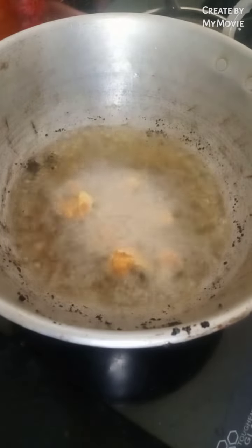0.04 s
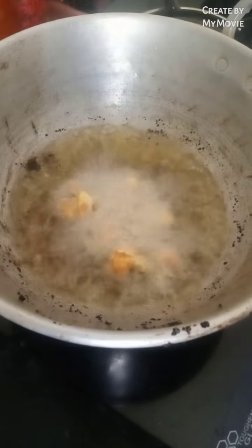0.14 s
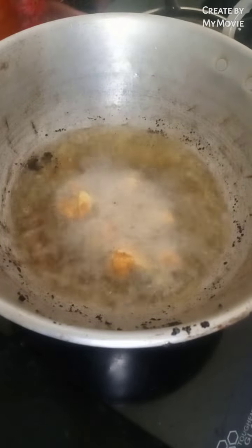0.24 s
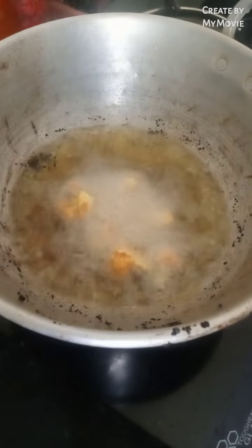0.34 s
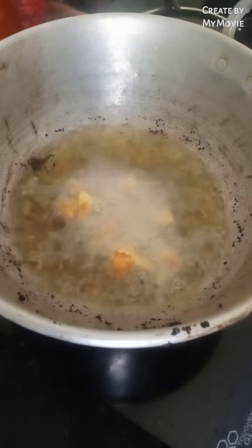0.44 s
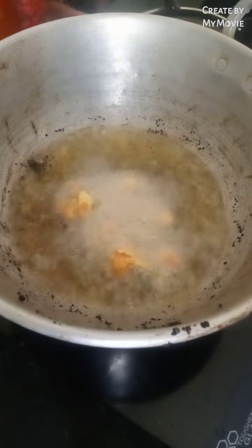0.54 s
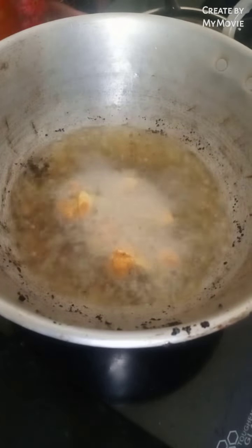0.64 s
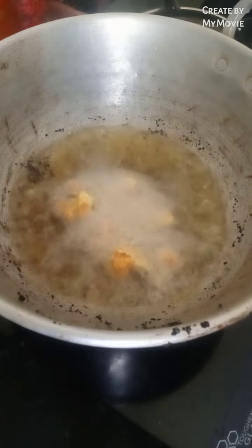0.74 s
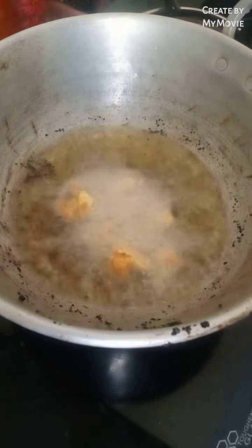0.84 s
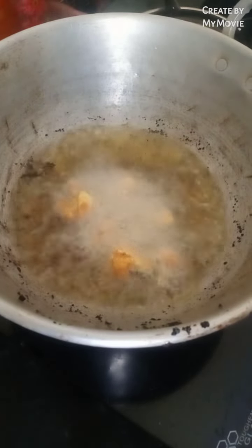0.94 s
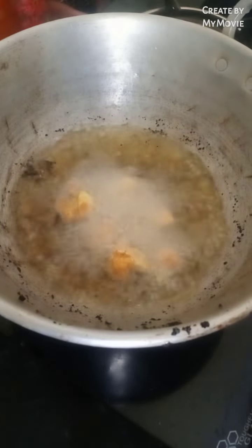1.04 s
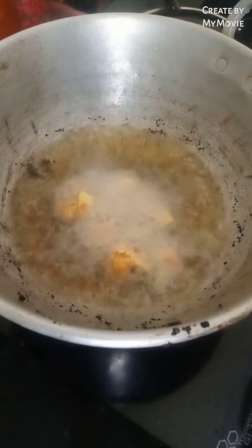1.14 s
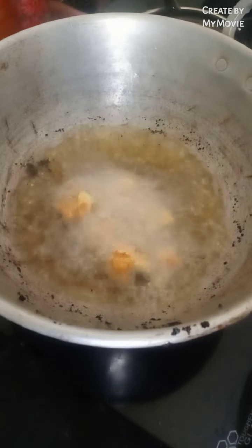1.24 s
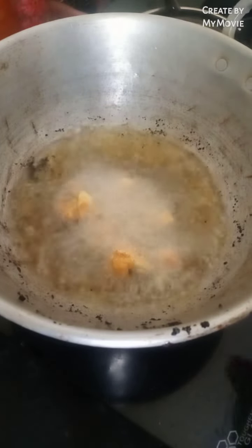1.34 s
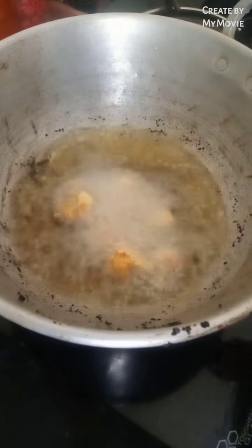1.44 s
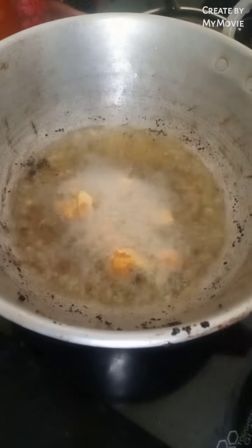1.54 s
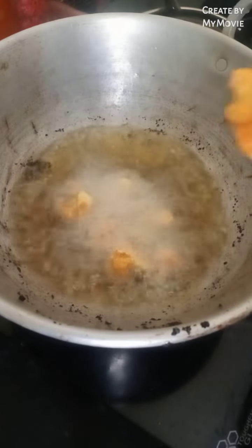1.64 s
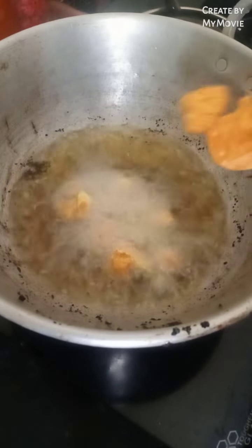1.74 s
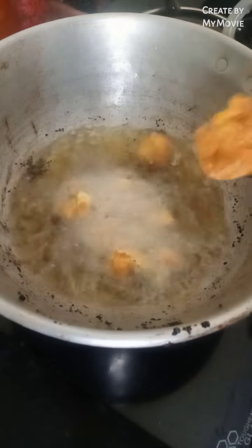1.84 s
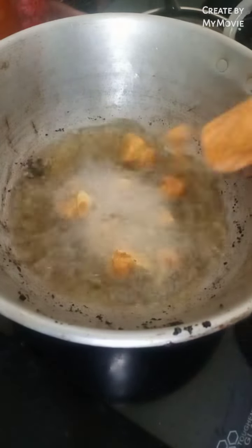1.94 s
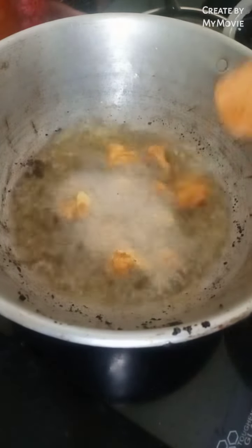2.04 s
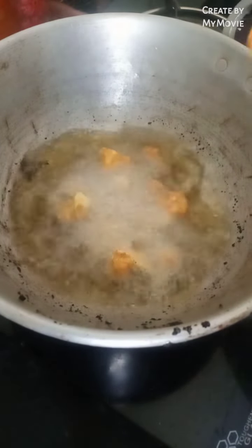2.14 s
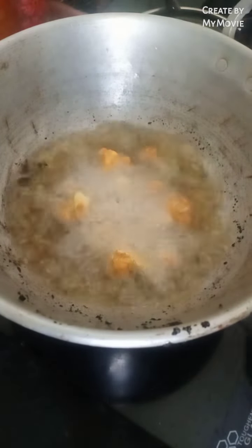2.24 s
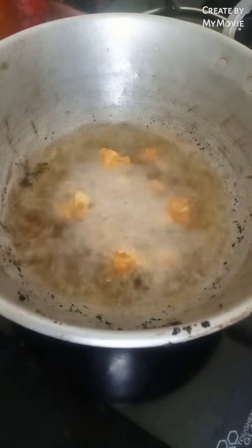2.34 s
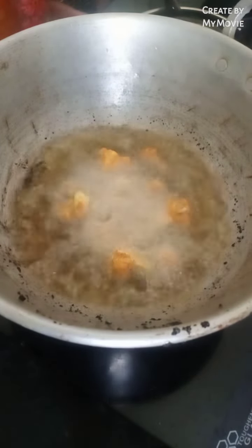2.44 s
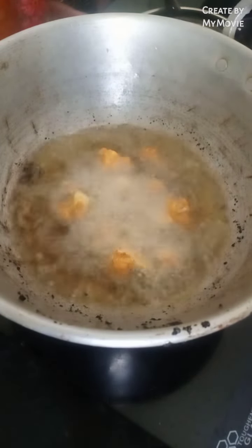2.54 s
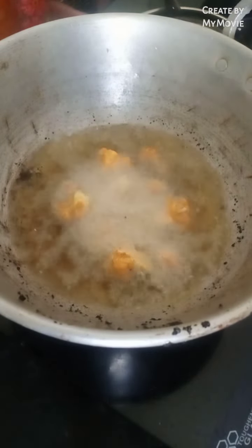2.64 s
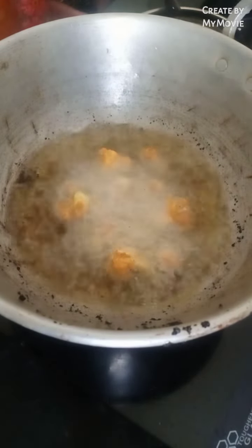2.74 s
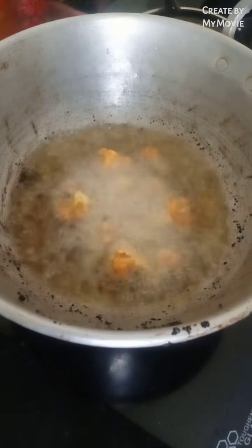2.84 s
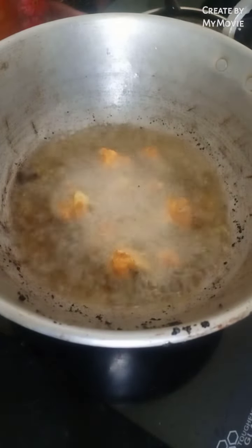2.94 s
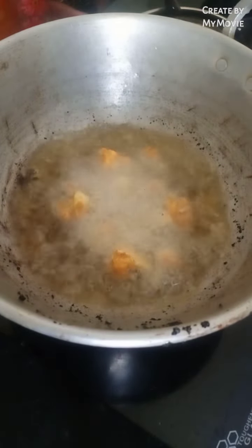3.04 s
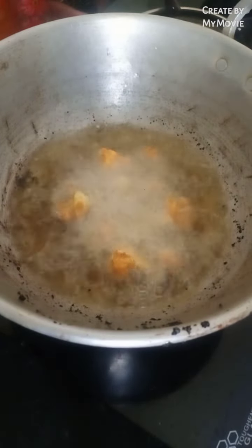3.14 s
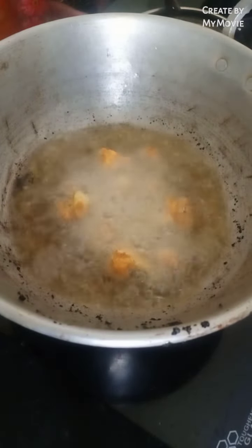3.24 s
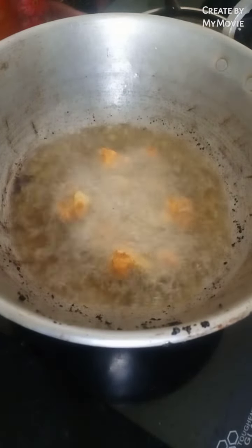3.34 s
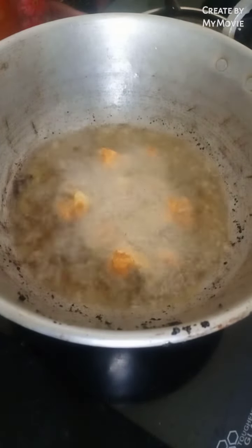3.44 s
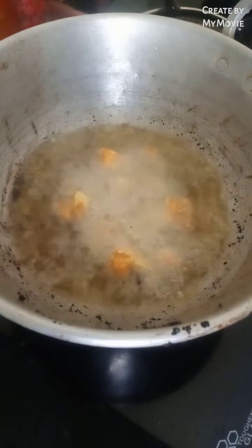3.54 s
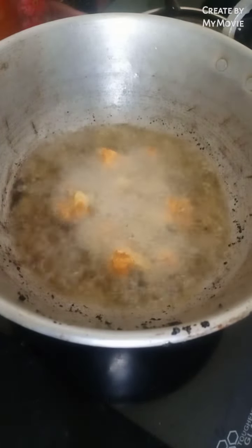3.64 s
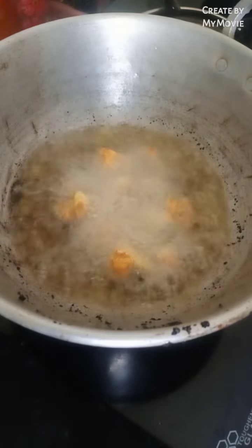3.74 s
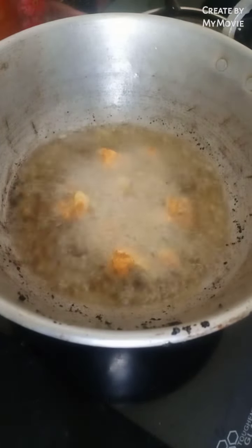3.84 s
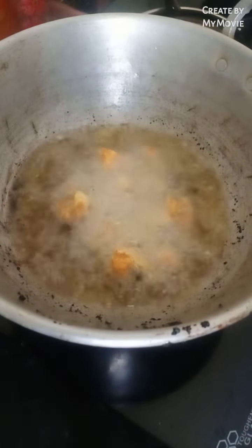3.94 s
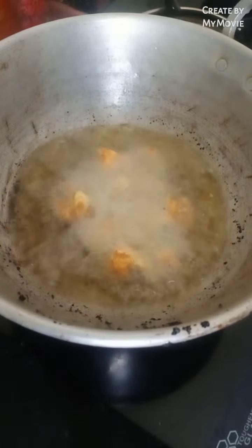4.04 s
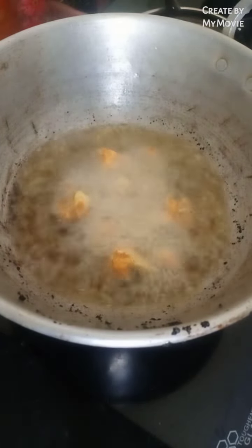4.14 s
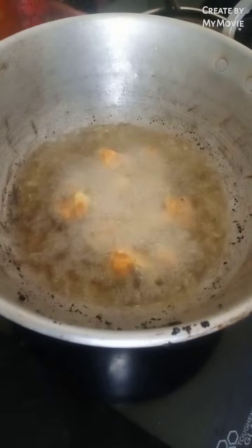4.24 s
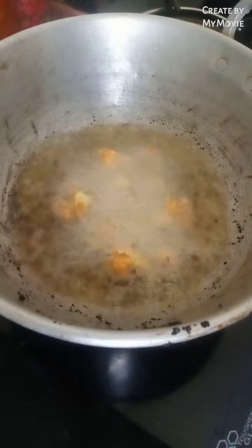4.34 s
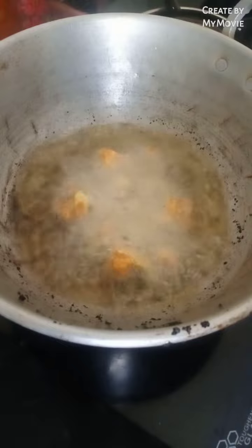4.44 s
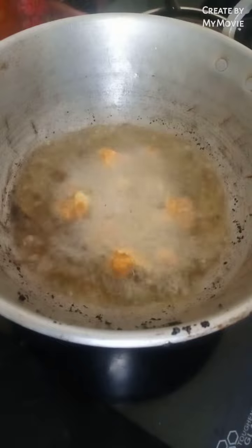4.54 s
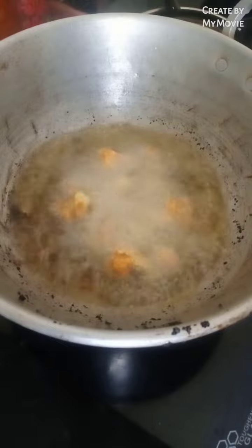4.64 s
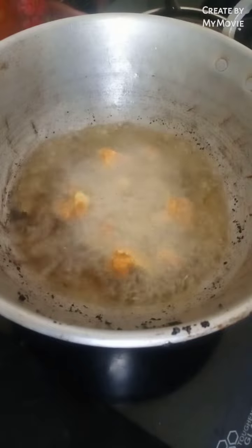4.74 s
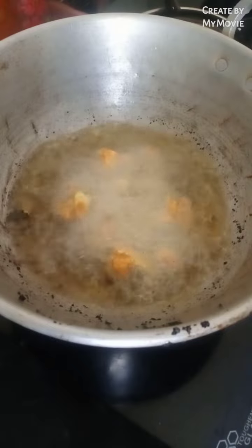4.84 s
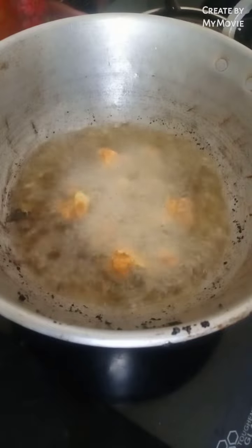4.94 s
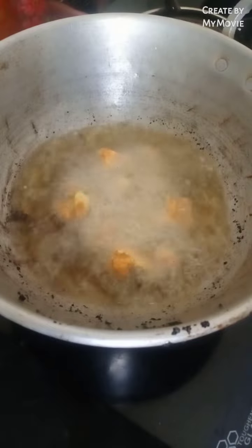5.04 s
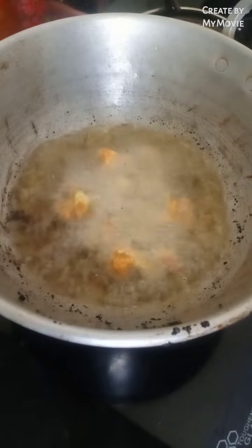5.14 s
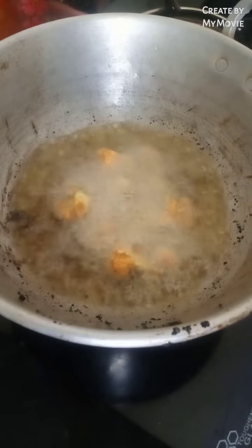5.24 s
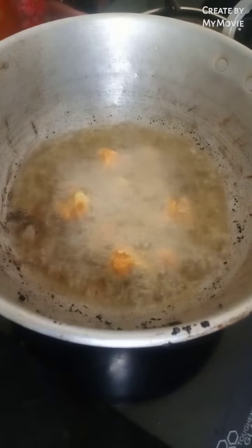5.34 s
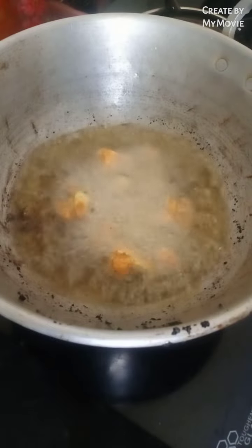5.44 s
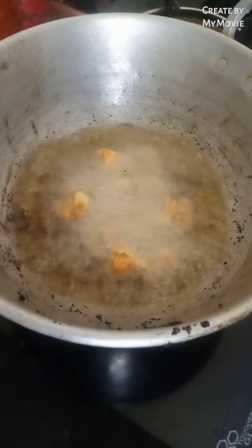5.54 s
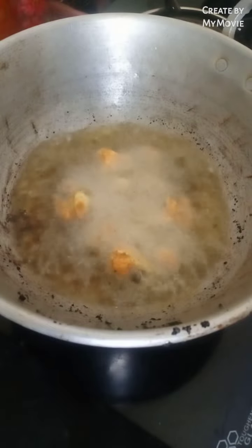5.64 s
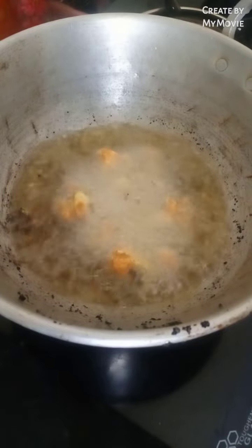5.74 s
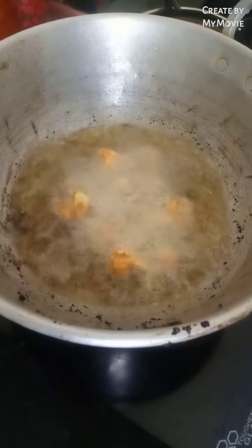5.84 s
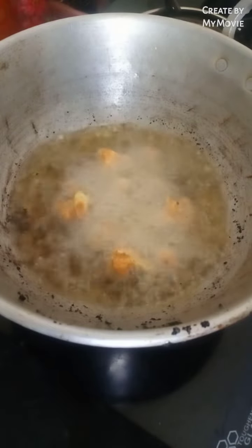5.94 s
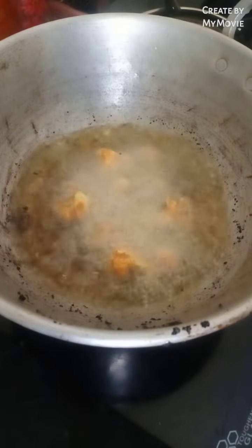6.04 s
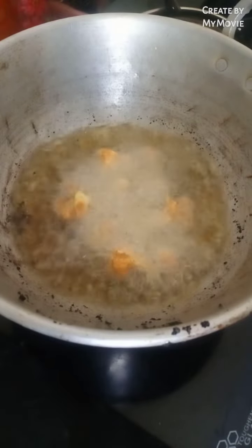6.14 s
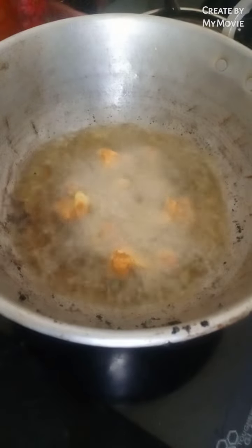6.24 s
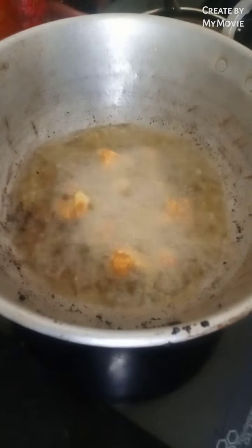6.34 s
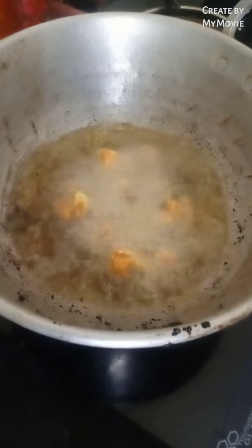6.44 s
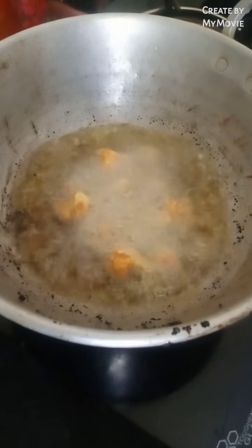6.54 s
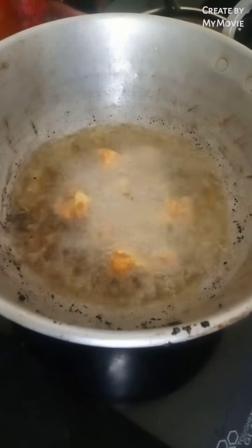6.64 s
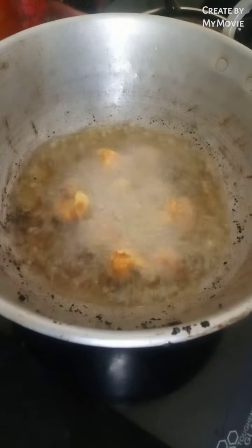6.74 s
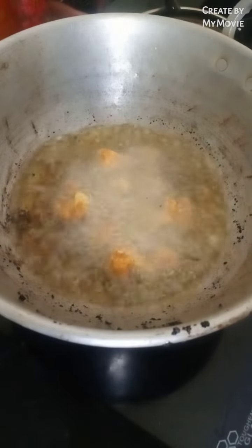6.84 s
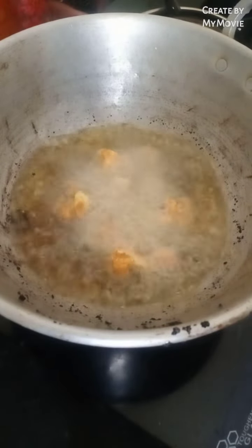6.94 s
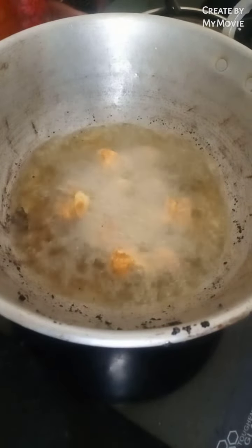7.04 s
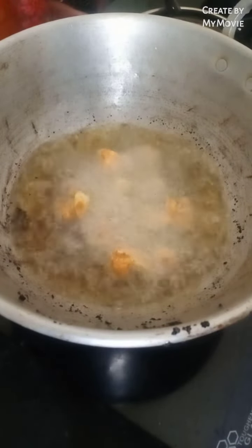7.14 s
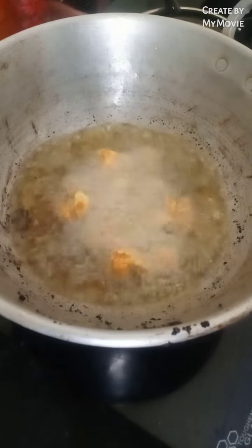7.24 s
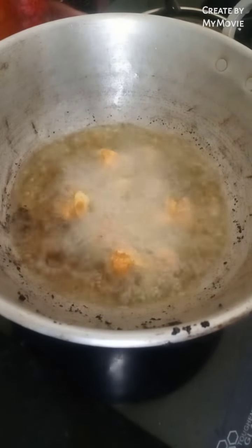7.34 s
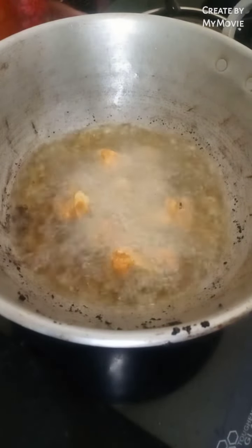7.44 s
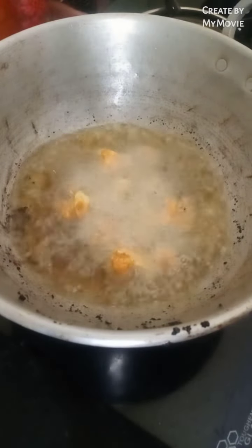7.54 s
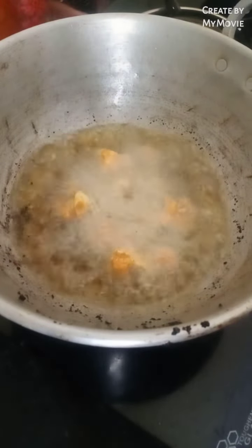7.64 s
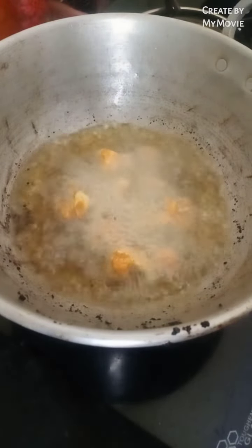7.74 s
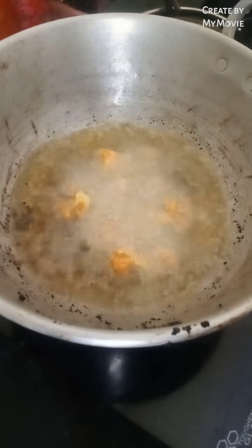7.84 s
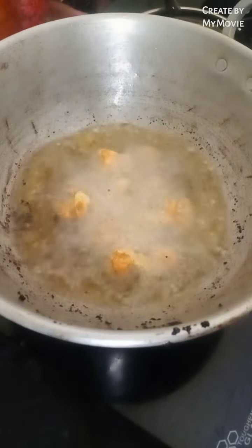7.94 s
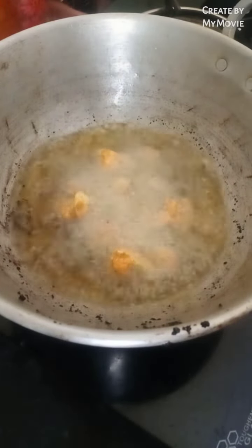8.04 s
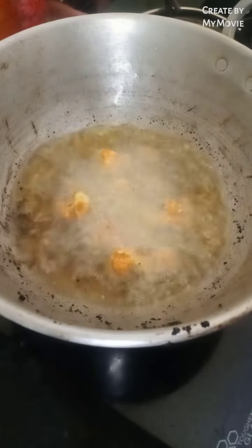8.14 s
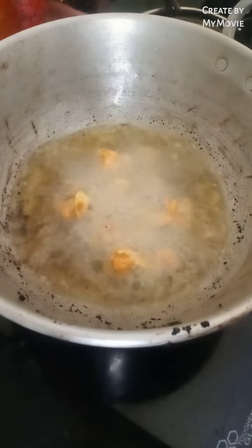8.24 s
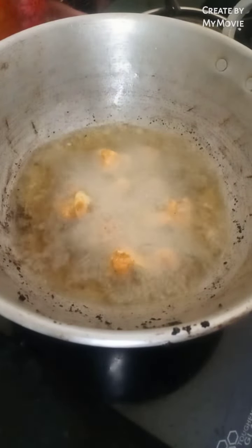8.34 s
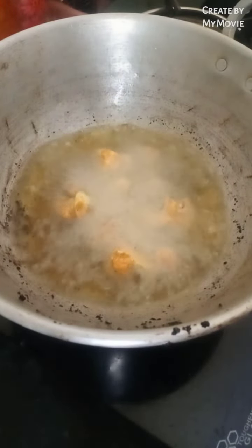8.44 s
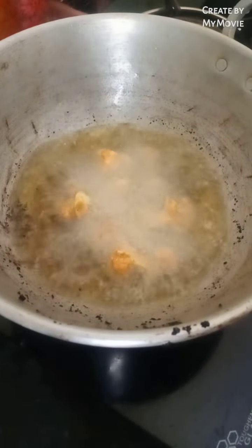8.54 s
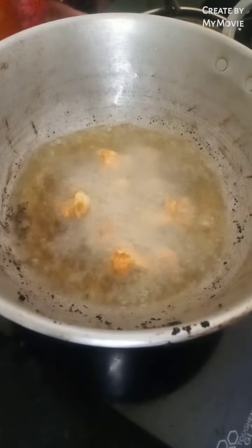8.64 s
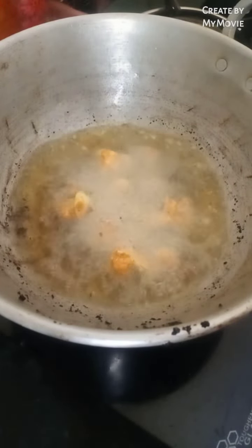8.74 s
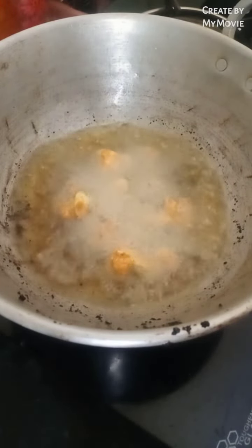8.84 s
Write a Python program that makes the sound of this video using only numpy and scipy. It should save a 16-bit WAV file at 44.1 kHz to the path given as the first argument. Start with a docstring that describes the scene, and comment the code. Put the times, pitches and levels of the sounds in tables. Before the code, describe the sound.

Battered vegetables fry in a deep metal pan of hot oil, heard close up in a kitchen. A bright, steady sizzle is dotted with popping bubbles and sharp spits. Just before two seconds, more pieces slide in and the frying grows louder and fuller, then slowly calms while the crackling continues. Faint room noise and a few soft, dull thuds lie underneath.

```python
"""In a kitchen, battered vegetables fry in a deep metal pan of hot oil, heard close up.
Steam bubbles burst as short pings by the thousand, and water droplets spit as they flash to steam.
The frying grows just before two seconds, as more pieces slide in, then slowly calms.
Its low part briefly swells now and then, the pan rings and hums along, and the room adds a short echo.
Faint room noise, a low rumble and a few dull thuds lie underneath."""
import sys
import numpy as np
from scipy import signal
from scipy.fft import rfft, irfft, next_fast_len
from scipy.io import wavfile

SR = 44100
rng = np.random.default_rng(int(sys.argv[2]) if len(sys.argv) > 2 else 0)


def generate_wav(sig):
    """Save sig (samples, or channels by samples) to the path in sys.argv[1] as 16-bit PCM at SR."""
    pcm = np.round(np.clip(np.atleast_2d(sig).T, -1, 1) * 32767).astype(np.int16)
    wavfile.write(sys.argv[1], SR, pcm)


N = 392041

# How hard the oil fries. Each row: time in seconds, then four relative levels in dB: the sizzle,
# the spitting against the sizzle, the share of large bubbles, the low part of the frying between swells.
FRYING = [(0, -23, -25, -1.5, -58), (.15, -26, -3.5, -1, -59), (.55, -27.5, -4, 0, -66),
          (.76, -24.5, -11, 0, -60), (.95, -26, -13, -1, -65), (1.02, -21, -6, -4.5, -61),
          (1.2, -23, -14, -2.5, -58), (1.5, -26, -4, -3.5, -65), (1.62, -22.5, -26, -7, -55),
          (1.755, -26, 3, 3, -57.5), (1.79, -19, -12, -1, -45), (1.95, -18, -13.5, -2, -43),
          (2.4, -20.5, -9.5, 1.5, -44), (2.7, -22.5, -7, 5.5, -40), (3.3, -24.5, -11, 5.5, -42),
          (4, -26, -6.5, 6, -49), (4.7, -26, -12, 3, -53), (5.2, -28.5, -7.5, 4, -60),
          (5.45, -24.5, -18, 2.5, -54), (6, -28, -6, 0.5, -62), (6.39, -26.5, -14, -1.5, -61),
          (6.68, -29.5, -8, 2.5, -61), (7.1, -28, -8, 1.5, -66), (7.35, -31, -2, -7, -59),
          (7.6, -29.5, -7, -2.5, -63), (8.2, -32, -7.5, -6.5, -64), (8.47, -28, -9, -2, -62),
          (8.89, -32.5, -5.5, -3, -62)]
# The tone colour of the frying and its echoes as the microphone hears them.
# Each row: frequency in Hz, boost or cut in dB.
MIC_COLOUR = [(1140, -24), (1250, -11), (1350, -4.5), (1800, -7), (2310, -4.5), (2600, -4.5), (3300, 1),
              (4800, 0), (6900, 3.5), (9300, -22.5), (10000, -21.5), (11300, -25), (13000, -15.5),
              (15000, -10.5)]


def gain_of(db):
    """Turns decibels into a number to multiply by."""
    return 10 ** (np.asarray(db) / 20)


def evened(x):
    """Scales a sound to an average (rms) level of 1."""
    return x / np.sqrt(np.mean(x ** 2) + 1e-20)


def value_at(points, hz):
    """Looks up a frequency in a table, blending between rows by octaves."""
    row_hz, value = np.transpose(points)
    return np.interp(np.log(hz + 1), np.log(row_hz + 1), value)


def follow(rows):
    """Turns a table over time into one curve for each value column."""
    times, *columns = np.transpose(rows)
    return [np.interp(np.arange(N) / SR, times, column) for column in columns]


def coloured(x, points):
    """Boosts or cuts each frequency as a table says."""
    size = next_fast_len(len(x))
    gains = gain_of(value_at(points, np.fft.rfftfreq(size, 1 / SR)))
    return irfft(rfft(x, size) * gains, size)[:len(x)]


def add(mix, start, sound):
    """Mixes a sound in at a start time in seconds."""
    part = mix[max(round(start * SR), 0):][:len(sound)]
    part += sound[:len(part)]


def clicks(per_s, spread_db, clump=1.):
    """Random clicks of uneven size; clump multiplies how often they come."""
    hits = np.flatnonzero(rng.random(N) < clump * per_s / SR)[:N // 4]
    size, side = rng.random((N // 4, 2))[:len(hits)].T
    out = np.zeros(N)
    out[hits] = gain_of(spread_db * np.minimum(-np.log(size), 6)) * np.sign(side - .5)
    return out


def flicker(ms, db):
    """A gain that wanders at random by about db, over about ms milliseconds."""
    drift = rng.standard_normal(N // 44 + 2)  # about one step a millisecond
    for _ in range(2):
        drift = signal.lfilter([1], [1, -np.exp(-1 / ms)], drift)
    return np.interp(np.arange(N) / 44, np.arange(len(drift)), gain_of(db * evened(drift)))


def swell_gain(rows, floor_gain, edge_s=0.05):
    """A gain that rests on a floor and rises smoothly for each (start, length, level)."""
    power = np.zeros(N)
    for start, length, db in rows:
        span = length + edge_s
        shape = signal.windows.tukey(round(span * SR), min(2 * edge_s / span, 1))
        add(power, start - edge_s / 2, gain_of(2 * db) * shape ** 2)
    return np.sqrt(power + floor_gain ** 2)


def resonate(x, hz, width):
    """Makes a sound ring at one pitch; a narrower width rings longer."""
    return signal.lfilter(*signal.iirpeak(hz, hz / width, SR), x)


def ringing(notes, drive):
    """Rings each (pitch, width, level) with a fresh sound from drive()."""
    out = np.zeros(N)
    for hz, width, db in notes:
        push = resonate(drive(), hz, width / 0.6)
        out += gain_of(db) * evened(resonate(push, hz, width))
    return evened(out)


def ping(hz, cycles, glide):
    """One bubble: a tone that swells and dies, its pitch climbing near the surface."""
    turns = np.arange(int(min(10 * cycles / hz, .1) * SR) + 8) / SR * hz
    age = turns / cycles
    return age * np.exp(1 - age) * np.sin(2 * np.pi * turns * (1 + glide * age))


def sizzle(sizzle_db, large_db, sizes=20):
    """Small bubbles burst; each size comes in clumps, as a piece sheds a string of them."""
    level = gain_of(sizzle_db - 1.5) * flicker(ms=21, db=0.76)
    surge = flicker(ms=4, db=2.5)
    crowd = gain_of(.9 * (sizzle_db + 25))  # harder frying means more bubbles, not only louder ones
    clumpiness = np.minimum(crowd ** -.8, 1.2)  # a crowd of bubbles evens the clumps out
    out = np.zeros(N)
    for hz in np.geomspace(1200, 16000, sizes):
        clump = crowd * (surge * flicker(ms=8, db=4)) ** clumpiness
        pops = clicks(per_s=9000 / sizes * (hz / 5000) ** .6, spread_db=2, clump=clump)
        pings = signal.oaconvolve(pops / np.sqrt(crowd), ping(hz, cycles=1.76, glide=0.017))[:N]
        largeness = np.clip(np.log2(2600 / hz), 0, 1)
        out += np.sqrt(hz) * gain_of(large_db * largeness) * evened(pings)
    return level * out / np.std(coloured(out, MIC_COLOUR))


def spitting_droplets(spray_gain):
    """Water droplets flash to steam: a fine spray of very high clicks and some loud snaps."""
    # Loud droplets. Each row: start in seconds, level in dB, the snap's body against that level in dB.
    droplets = [(0.0643, -17, -9), (0.18, -24, -9), (0.4435, -15, -9), (0.5686, -11.5, -6),
                (0.592, -10.5, -13), (0.7193, -25, -5), (0.7652, -19, -9), (0.7981, -17, -11),
                (1.44, -17, -9), (1.5843, -20, -11), (1.7449, -16, -9), (1.7594, -12, -9),
                (1.9614, -15, -9), (1.9809, -12, -5), (2.056, -12, -9), (2.2503, -19, -9),
                (2.3037, -27, -9), (2.6519, -22, -7), (2.7262, -25, -9), (2.794, -12, -14),
                (3.0066, -21, -12), (3.7474, -15, -9), (3.8681, -28, -9), (3.9938, -21, -9),
                (4.2537, -13, -9), (4.316, -20, -5), (4.5251, -22, -9), (4.7571, -14, -3),
                (5.0689, -15, -14), (5.3028, -23, -9), (5.3812, -16, -5), (5.5533, -19, -5),
                (5.7083, -16, -7), (6.3355, -28, -9), (6.3774, -13.5, -5), (6.5715, -28, -11),
                (6.928, -17, -9), (6.959, -16, -11), (7.0364, -18, -6), (7.079, -16, -6), (7.5512, -21, -7),
                (7.7277, -13, -2), (7.831, -28, -12), (8.4492, -32, -9)]
    spray = spray_gain * evened(clicks(per_s=3600, spread_db=4, clump=flicker(ms=5.9, db=5.5)))
    out = gain_of(18) * signal.sosfilt(signal.butter(4, 11500, "high", fs=SR, output="sos"), spray)
    snaps = rng.standard_normal((len(droplets), 500)) * np.exp(-np.arange(500) / SR / 0.0036)
    tick = ping(14600, cycles=0.91, glide=0)
    for (start, db, body_db), snap in zip(droplets, snaps):
        add(out, start, gain_of(db) * signal.oaconvolve(snap, tick))
        add(out, start, gain_of(db + body_db) * snap)
    return out


def lesser_bubbles(count=40, low_hz=2690, high_hz=6860, crack_db=-11.5):
    """Rows for weaker bubbles of random time and size, louder when the frying is harder."""
    when, weakness, size = rng.random((count, 3)).T
    starts = when * N / SR
    sizzle_db = np.interp(starts, *np.transpose(FRYING)[:2])
    db = sizzle_db + 11 - 4 * weakness
    hz = low_hz * (high_hz / low_hz) ** size
    return list(zip(starts, db, hz, np.full(count, crack_db)))


def bursting_bubbles():
    """Single bubbles crack and ping, each with five weaker neighbours just after it."""
    # Loud bubbles. Each row: start in seconds, level in dB, pitch in Hz, crack against that level in dB.
    loud_bubbles = [(0.0402, -11, 6640, -5), (0.1326, -10.5, 5000, -12), (0.169, -18, 4290, -19),
                    (0.2243, -15, 3970, -18), (0.252, -6.5, 6250, -16), (0.3403, -4.5, 6600, -14),
                    (0.41, -7, 4370, -19), (0.4297, -7, 4270, -21), (0.5068, -15.5, 2200, -10),
                    (0.5492, -8, 4250, -14), (0.631, -10, 3970, -21), (0.716, -10, 3720, -9),
                    (0.7711, -8, 5300, -20), (0.869, -10.5, 3650, -4), (0.948, -13, 5310, -22),
                    (0.972, -7, 6870, -10), (1.051, -8, 3160, -20), (1.074, -10.5, 2930, -24),
                    (1.0829, -11, 4850, -20), (1.121, -11, 5100, -21), (1.1378, -7.5, 2910, -17),
                    (1.1832, -17, 6110, -8), (1.207, -11, 6900, -12), (1.2461, -15, 6300, -4),
                    (1.277, -14, 2730, -14), (1.324, -7, 6720, -21), (1.3745, -13.5, 2730, -12),
                    (1.3803, -16, 3280, -14), (1.4144, -9, 6590, -12), (1.4216, -11.5, 3060, -19),
                    (1.4857, -7.5, 3450, -16), (1.5143, -10, 3980, -24), (1.532, -7.5, 6300, -10),
                    (1.5887, -11, 5650, -4), (1.6434, -6.5, 6400, -7), (1.701, -7.5, 6900, -7),
                    (1.7454, -11, 6970, -10), (1.761, -10, 5100, -14), (2.1146, -17, 5790, -16),
                    (2.199, -18, 3400, -18), (2.5112, -10, 3030, -11), (2.5706, -20.5, 5560, -12),
                    (2.596, -12, 2920, -14), (2.701, -18, 6880, -15), (2.7432, -10, 6340, -12),
                    (2.8147, -20, 2800, -12), (2.824, -11.5, 4800, -3.5), (2.891, -14, 3280, -8),
                    (2.9223, -12, 3960, -8), (2.9951, -9, 6840, -5), (3.0325, -10, 6660, -8),
                    (3.058, -10, 4000, -14), (3.102, -8.5, 5650, -9), (3.1551, -9, 2880, -11),
                    (3.287, -3.5, 6700, -18), (3.3502, -8, 4000, -21), (3.3852, -6.5, 5700, -14),
                    (3.4521, -15, 3420, -2.5), (3.5159, -16, 5600, -14), (3.5483, -25, 6960, -12),
                    (3.6, -9.5, 5300, -3), (3.7013, -9, 2730, -14), (3.7486, -11, 3400, -12),
                    (3.8092, -14, 5670, -4), (3.8554, -12, 5330, -10), (3.904, -11, 4740, -10),
                    (3.9314, -1.5, 6600, -14), (3.9937, -13.5, 3160, -10), (4.0346, -6, 2970, -16),
                    (4.0716, -10.5, 6540, -4), (4.0996, -12.5, 2300, -15), (4.115, -9, 2970, -19),
                    (4.142, -10.5, 4590, -12), (4.1679, -10, 4000, -15), (4.1904, -8.5, 6200, -17),
                    (4.2193, -7, 5970, -12), (4.282, -12.5, 4000, -5), (4.2945, -8.5, 3900, -6),
                    (4.36, -8, 5500, -8), (4.416, -15, 5420, -8), (4.4367, -10, 3820, -10),
                    (4.5221, -14, 4970, -9), (4.577, -10, 3320, -17), (4.6047, -13, 4300, -14),
                    (4.629, -10, 6730, -8), (4.6768, -14, 3680, -17.5), (4.69, -14, 5740, -22),
                    (4.72, -11, 3530, -7), (4.8005, -10, 6400, -10), (4.8523, -7, 4960, -13),
                    (4.8916, -13, 2800, -9.5), (4.9496, -19, 4730, -12), (5.019, -21, 3900, -10),
                    (5.0507, -9, 6250, -14), (5.1437, -11, 6600, -17), (5.1678, -12.5, 3330, -12),
                    (5.1889, -8.5, 4170, -15), (5.2094, -5.5, 6550, -14), (5.271, -14, 5980, -12),
                    (5.2989, -15, 4030, -2), (5.3298, -6, 6710, -11), (5.3428, -6, 4030, -14),
                    (5.378, -9, 3840, -9), (5.4395, -18, 6800, -10), (5.462, -12, 3240, -12),
                    (5.484, -11, 3470, -7), (5.5198, -11, 4880, -10), (5.6952, -15.5, 2300, -3),
                    (5.7084, -14.5, 2400, -8), (5.7852, -11, 4030, -12), (5.814, -6.5, 6740, -12),
                    (5.8541, -12.5, 3350, -15), (5.8735, -11.5, 2960, -7), (5.9264, -10.5, 6720, -2),
                    (5.9648, -17, 4100, -5), (5.9883, -8.5, 4070, -10), (6.0582, -6.5, 3180, -10),
                    (6.136, -15, 4200, -12), (6.154, -14.5, 3970, -3.5), (6.1795, -14.5, 2990, -8),
                    (6.2068, -13, 4880, -14), (6.2177, -11, 5620, -10), (6.2552, -9, 5500, -21),
                    (6.358, -14, 3900, -5.5), (6.3705, -12, 6750, -2), (6.4273, -15, 6890, -12),
                    (6.575, -10.5, 5990, -14), (6.5887, -9.5, 2760, -14), (6.6812, -0.5, 6800, -25),
                    (6.7336, -4, 5460, -14), (6.86, -13, 2700, -10), (6.8883, -10, 6840, -6),
                    (6.9361, -27, 5600, -14), (6.9724, -15.5, 6150, 1), (7.0105, -16, 5780, -5),
                    (7.0788, -21, 5120, -12), (7.0913, -10.5, 3670, -9), (7.1656, -12, 6060, -17),
                    (7.1791, -6, 6700, -18), (7.2629, -20, 6130, -14), (7.2995, -11, 6130, -18),
                    (7.3422, -21, 1790, -4), (7.468, -10, 6670, -7), (7.5133, -11, 4270, -7),
                    (7.5802, -5.5, 5800, -14), (7.614, -8.5, 5900, -10), (7.7209, -25, 6980, -12),
                    (7.7196, -14, 5370, -9), (7.7837, -11, 6650, -8.5), (7.8496, -9.5, 4700, -17),
                    (7.9039, -15, 3360, -12), (7.9843, -13, 5660, -12), (8.022, -7, 2950, -33),
                    (8.1015, -11, 5340, -9), (8.2196, -8.5, 6250, -17), (8.2751, -4, 6760, -19),
                    (8.299, -7.5, 4060, -11.5), (8.3465, -12, 4000, -11), (8.3631, -13, 1930, -16),
                    (8.4005, -9, 3850, -7.5), (8.4637, -10, 4100, -17), (8.481, -8.5, 4100, -15),
                    (8.507, -9.5, 7100, -14), (8.564, -11, 5100, -10), (8.5889, -7.5, 3880, -19),
                    (8.699, -11.5, 4470, -12), (8.771, -16, 6700, -10), (8.8039, -27, 3400, -9),
                    (8.804, -15.5, 2880, -12), (8.8682, -8, 6500, -18.5)]
    rows = list(loud_bubbles) + lesser_bubbles()
    out, t = np.zeros(N), np.arange(500) / SR
    neighbour_draws = rng.random((len(rows), 5, 3))
    cracks = rng.standard_normal((len(rows), len(t))) * np.exp(-t / 0.0058) * (1 - np.exp(-t / 0.00021))
    for (start, db, hz, crack_db), neighbours, crack in zip(rows, neighbour_draws, cracks):
        level_db = db - value_at(MIC_COLOUR, hz)  # allows for the colouring this pitch gets later
        film = ping(1.06 * hz, cycles=0.36, glide=0)  # the torn film sounds widely around the ping
        add(out, start, gain_of(level_db - 7) * ping(hz, cycles=2.67, glide=0.0007))
        add(out, start, gain_of(level_db + crack_db) * np.convolve(crack, film / np.linalg.norm(film)))
        for lateness, pitch, weakness in neighbours:
            delay = .0015 + .016 * lateness ** 1.7
            neighbour = ping(hz * (0.879 + 0.21 * pitch), cycles=1.8, glide=0.0089)
            add(out, start + delay, gain_of(level_db - 7.5 - 8.5 * weakness) * neighbour)
    return out


def pan_wall(bursts):
    """The thin metal wall rings on after every burst and lends a hollow colour."""
    # The wall's notes. Each row: pitch in Hz, width in Hz, level in dB.
    wall_notes = [(1340, 36, -3), (1611, 25, -0.5), (2068, 18, -2.5), (2200, 13, -3), (2318, 27, 4.5),
                  (2766, 20, -1.5), (3020, 20, -3.5)]
    return sum(gain_of(db) * resonate(bursts, hz, width) for hz, width, db in wall_notes)


def kitchen_tail(bursts):
    """Bursts all over the oil take different paths through the room and blur into a fading hiss."""
    # How long the room sounds on. Each row: frequency in Hz, seconds to fade by 60 dB.
    fade_times = [(1000, 0.29), (3000, 0.19), (6000, 0.1), (14000, 0.2)]
    frames = dict(fs=SR, nperseg=256, noverlap=192)
    hz, t, bands = signal.stft(bursts, **frames)
    kept = gain_of(-120 * (t[1] - t[0]) / value_at(fade_times, hz))  # share of power left after a step
    power = np.array([signal.lfilter([0, 0, 1 - k], [1, -k], p) for k, p in zip(kept, abs(bands) ** 2)])
    noise = signal.stft(rng.standard_normal(N), **frames)[2]
    tail = signal.istft(np.sqrt(power) * noise, **frames)[1][:N]
    return evened(tail) * np.std(bursts)


def wall_echoes(bursts, fade_s=0.15):
    """The kitchen walls send back quick, scattered echoes that all bursts share."""
    echoes, slots = np.zeros(SR // 4), np.arange(60, SR // 4 - 20, 20)
    strengths = rng.choice([-1., 1.], len(slots)) * gain_of(-60 * slots / SR / fade_s)
    echoes[slots + rng.integers(0, 20, len(slots))] = strengths
    return signal.oaconvolve(bursts, echoes / np.linalg.norm(echoes))[:N]


def low_frying_band(steady_db, swell_s=0.049):
    """The low part of the frying, about 800-1200 Hz, stays faint and briefly swells."""
    # The notes of this band. Each row: pitch in Hz, width in Hz, relative level in dB.
    band_notes = [(796, 68, -3), (879, 74, 5), (970, 65, 6), (1040, 18, 6), (1107, 28, 1), (1198, 79, 5)]
    # Brief swells. Each row: middle in seconds, level in dB.
    swells = [(.52, -52), (.76, -47.5), (.89, -52), (1.01, -51), (1.21, -56), (1.46, -42.5), (3.22, -34),
              (3.51, -42), (3.71, -44), (3.96, -45), (4.13, -46), (4.31, -39), (4.56, -43), (4.9, -50),
              (5.27, -47), (5.47, -51), (5.69, -47), (5.89, -47), (6.14, -55), (6.39, -45), (7.08, -50)]
    band = ringing(band_notes, lambda: flicker(ms=9.6, db=4) * clicks(per_s=250, spread_db=1))
    spans = [(middle - swell_s / 2, swell_s, db) for middle, db in swells]
    return band * swell_gain(spans, gain_of(steady_db))


def pan_hum():
    """Many tiny taps keep the pan's low notes humming, in short swells."""
    # The pan's low notes. Each row: pitch in Hz, width in Hz, relative level in dB.
    pan_notes = [(717.4, 18.7, -2.5), (660, 114, -12)]
    # Swells of the hum. Each row: start in seconds, length in seconds, level in dB.
    hum_swells = [(0.14, 0.05, -48), (0.292, 0.17, -52.5), (1.206, 0.033, -47.5), (1.42, 0.05, -50),
                  (1.733, 0.05, -47.5), (1.866, 0.038, -49), (2.03, 0.2, -49), (2.485, 0.054, -48),
                  (2.636, 0.13, -43), (2.96, 0.13, -50.5), (3.184, 0.36, -45), (3.628, 0.092, -44.5),
                  (3.752, 0.15, -49), (4.044, 0.056, -48), (4.151, 0.045, -49), (4.26, 0.11, -50),
                  (4.382, 0.056, -50.5), (4.693, 0.055, -50.5), (4.787, 0.057, -44), (5.454, 0.046, -49),
                  (6.077, 0.12, -52.5), (6.354, 0.081, -47), (6.543, 0.2, -51.5), (6.811, 0.046, -52)]
    hum = ringing(pan_notes, lambda: clicks(per_s=900, spread_db=-0.5))
    return hum * swell_gain(hum_swells, gain_of(-68.5) * flicker(ms=10, db=2))


def kitchen_air():
    """Faint room noise with a wavering, slowly growing drone, over a rumble that comes and goes."""
    # The room noise's colour. Each row: frequency in Hz, relative level in dB.
    air_colour = [(12, -51), (20, -34), (75, -16), (119, -7.5), (232, -3.5), (261, -6.5), (527, -8.5),
                  (694, -4.5), (769, -4), (867, -5.5), (1200, -30), (1560, -46), (2640, -120)]
    # Swells of the rumble. Each row: start in seconds, length in seconds, level in dB.
    rumble_swells = [(0.295, 0.068, -58), (0.76, 0.124, -58), (1.2, 0.048, -55), (1.34, 0.049, -60),
                     (2.639, 0.081, -55), (2.888, 0.13, -61), (3.589, 0.03, -62), (5.13, 0.058, -60),
                     (5.371, 0.064, -61), (5.546, 0.07, -58), (5.75, 0.14, -58), (6.261, 0.182, -59.5),
                     (6.78, 0.18, -56), (7.202, 0.1, -62), (7.346, 0.04, -55), (7.983, 0.23, -61.5),
                     (8.722, 0.19, -60)]
    rumble_notes = [(68.3, 12, 8), (91, 15, 2.5), (30, 57, -4), (150, 59, -10)]
    rumble = ringing(rumble_notes, lambda: rng.standard_normal(N))
    drone = ringing([(230.7, 7.5, 0)], lambda: flicker(ms=150, db=5.5) * rng.standard_normal(N))
    drone *= gain_of(-18 + 1.4 * np.arange(N) / SR)  # grows 1.4 dB a second
    air = evened(coloured(rng.standard_normal(N), air_colour))
    rumble *= swell_gain(rumble_swells, gain_of(-72.5) * flicker(ms=44, db=2.5))
    return gain_of(-60.5) * (air + drone) + rumble


def dull_thuds():
    """Low thuds and brief hums nearby: each is a puff of noise ringing at one pitch."""
    # Each row: start in seconds, level in dB, pitch in Hz, width in Hz, length in seconds.
    thuds = [(0.475, -60, 343, 19, 0.15), (1.754, -58, 194, 250, 0.097), (2.625, -39, 336, 54, 0.042),
             (2.629, -43, 200, 50, 0.096), (2.826, -53.5, 440, 90, 0.089), (3.58, -55, 304, 120, 0.13),
             (5.541, -46.5, 348, 75, 0.084), (6.519, -47.5, 675, 12, 0.24), (6.83, -59, 160, 60, 0.14)]
    out = np.zeros(N)
    for (start, db, hz, width, length), puff in zip(thuds, rng.standard_normal((len(thuds), SR // 2))):
        ring = resonate(resonate(puff, hz, width), hz, width)
        ring = evened(ring[-int(length * SR):])
        shape = signal.windows.tukey(len(ring), .4) * np.linspace(1.2, .7, len(ring))
        add(out, start, gain_of(db) * ring * shape)
    return out


def scene():
    """Mixes the bursts in the pan, their echoes and the low sounds around into one channel."""
    sizzle_db, spit_db, large_db, low_band_db = follow(FRYING)
    spray_gain = gain_of(sizzle_db + spit_db - 4.5) * flicker(ms=16, db=3.7)
    bursts = sizzle(sizzle_db, large_db) + spitting_droplets(spray_gain) + bursting_bubbles()
    room = gain_of(-4) * kitchen_tail(bursts) + gain_of(-10) * wall_echoes(bursts)
    frying = coloured(bursts + pan_wall(bursts) + room, MIC_COLOUR)
    return (frying + low_frying_band(low_band_db) + pan_hum() + dull_thuds() + kitchen_air())[None]


def record(dry, cutoff_hz=15500):
    """Cuts away the very highest treble."""
    low_pass = signal.firwin(511, cutoff_hz, window=("kaiser", 9), fs=SR)
    return signal.oaconvolve(dry, low_pass[None], "same")


dry = scene()
out = record(dry)
generate_wav(out)
```